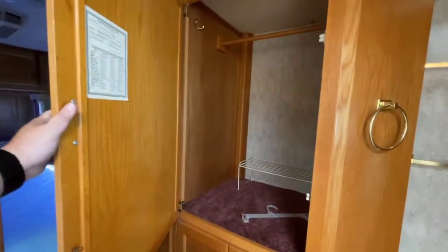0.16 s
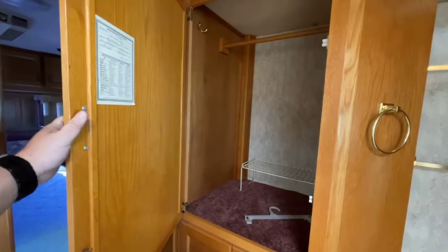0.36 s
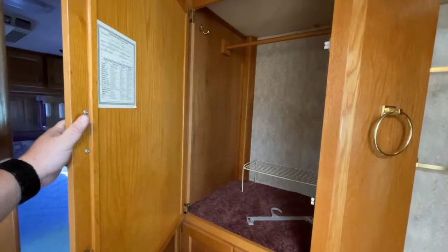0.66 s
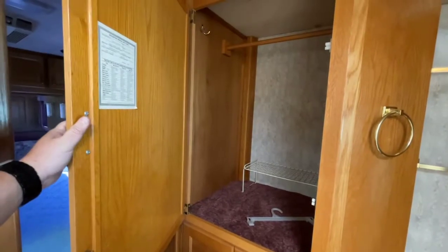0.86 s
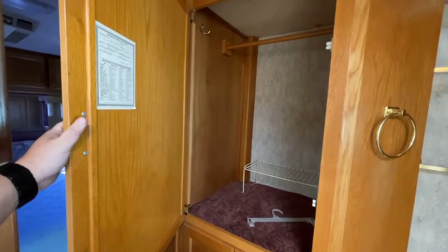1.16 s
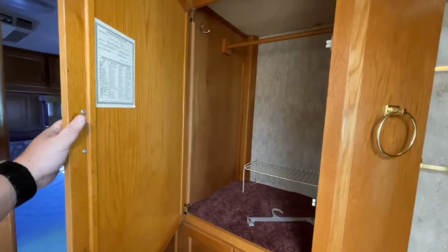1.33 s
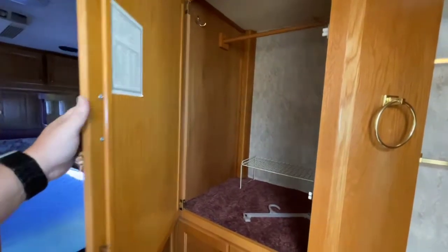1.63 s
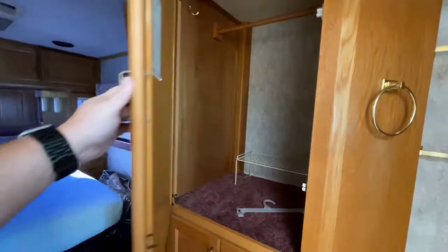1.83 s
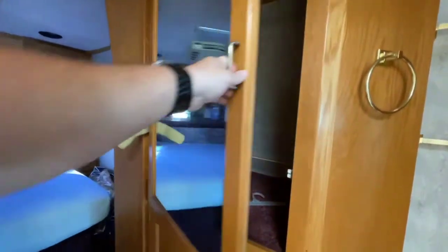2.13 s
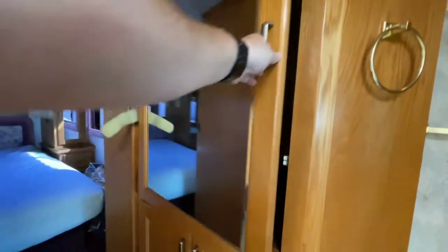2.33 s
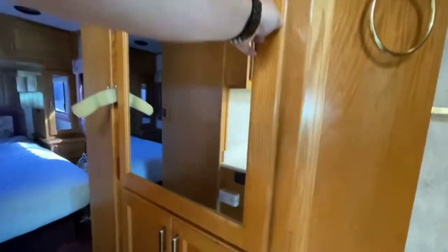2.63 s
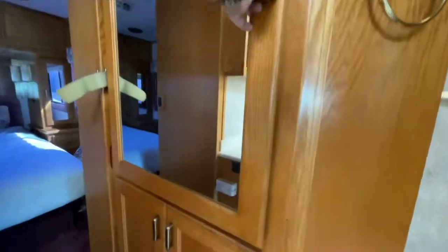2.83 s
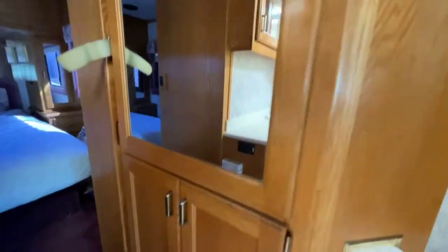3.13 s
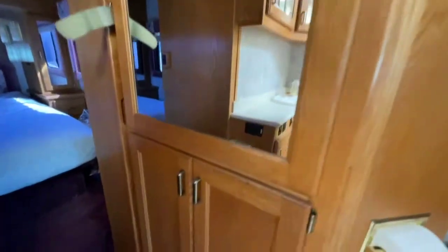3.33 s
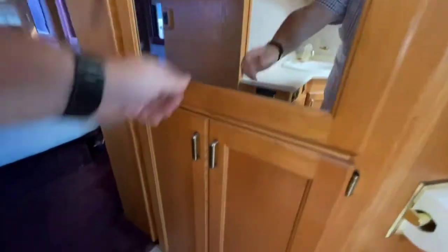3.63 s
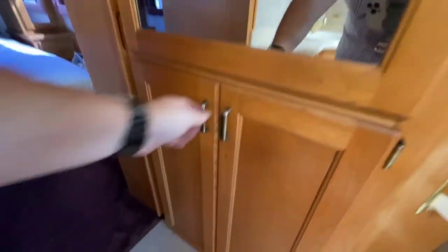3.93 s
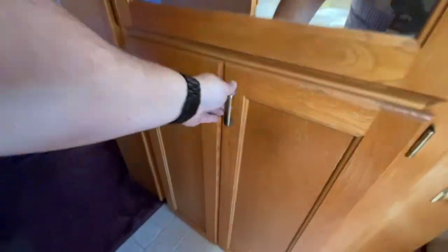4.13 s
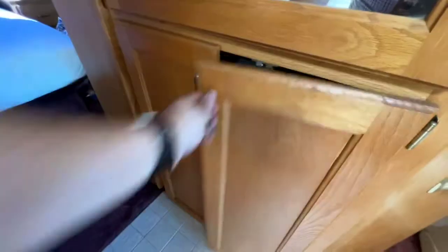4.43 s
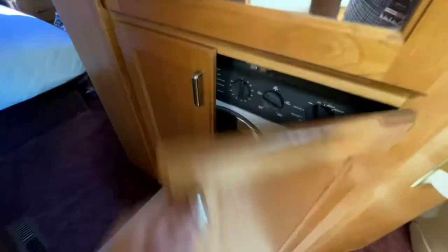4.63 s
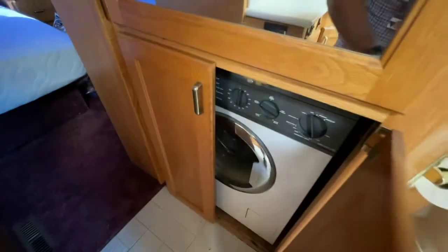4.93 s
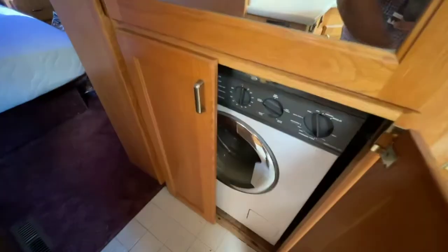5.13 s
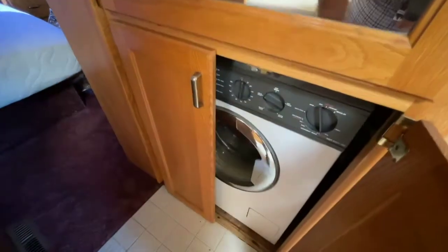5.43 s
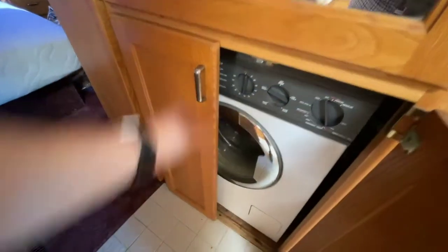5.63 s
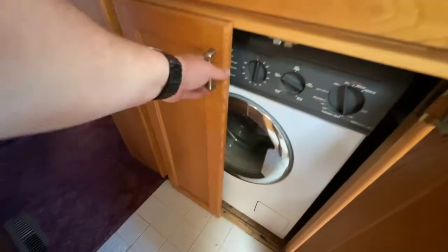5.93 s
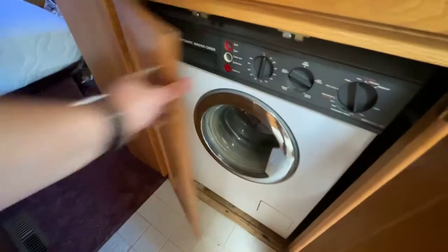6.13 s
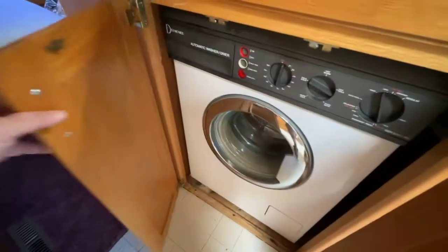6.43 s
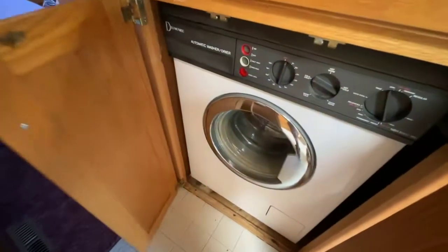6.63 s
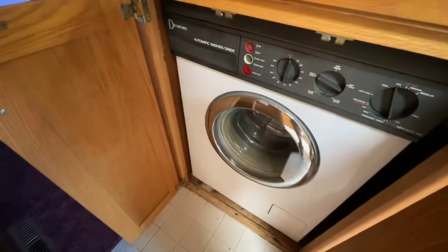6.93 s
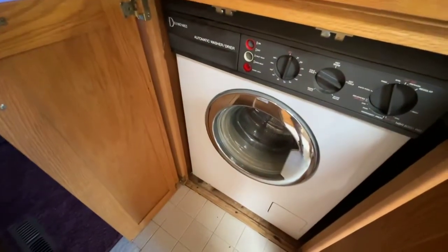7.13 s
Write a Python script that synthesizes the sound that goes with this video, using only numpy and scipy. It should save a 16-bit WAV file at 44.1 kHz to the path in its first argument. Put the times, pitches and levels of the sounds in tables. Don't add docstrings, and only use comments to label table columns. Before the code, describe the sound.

A small wooden vehicle interior, dry and close to a handheld microphone. A soft low rumble with faint passing vehicles runs throughout, swelling slightly with movement. A crisp finger tick at 0.4 s, very faint high squeaks from 0.9 to 2 s, and another tick at 2.1 s. At 2.6 s a hand takes a handle with a tight rattling clack and dull panel thud. At 3.1 s the wardrobe door slams, by far the loudest event: a double or triple crack, deep hollow boom and ringing frame, with small bounces until about 3.5 s. Light touches near 4.1 s, a short grinding drag, then a catch snaps at 4.3 s with a thud and thin spring ring. Soft rubbing around 5 s. A hand knocks at 5.7 s and the second catch snaps at 5.9 s, ringing briefly. Small taps and light rubs fade from 6.1 to 6.9 s, leaving rumble.

```python
import sys
import numpy as np
from scipy import signal
from scipy.io import wavfile

SR = 44100
rng = np.random.default_rng(int(sys.argv[2]) if len(sys.argv) > 2 else 0)


def unload_wav(signal):
    wavfile.write(
        sys.argv[1],
        SR,
        np.round(np.clip(np.atleast_2d(signal).T, -1, 1) * 32767).astype(np.int16),
    )


def undo_db(level):
    steps = np.asarray(level, float) / 20
    return 10 ** steps


N = 321087
STEP = 64


def add(out, start_s, sound):
    i = round(start_s * SR)
    out[i:i + len(sound)] += sound[:N - i]


def at_hz(points, hz):
    table = np.array(points)
    return np.interp(np.log(hz), np.log(table[:, 0]), table[:, 1])


EDGES = 26 * 2 ** np.arange(0, 9.4, 1 / 3)
BANK = [signal.butter(2, EDGES[k:k + 2], "band", fs=SR, output="sos") for k in range(len(EDGES) - 1)]
ALL_BANDS = range(len(BANK))
WOOD_BANDS = range(8, len(BANK))


def band(x, k):
    return signal.sosfilt(BANK[k], x)


def band_centre(k):
    return np.sqrt(EDGES[k] * EDGES[k + 1])


def drift(rate_hz):
    r = np.exp(-2 * np.pi * STEP * rate_hz / SR)
    white = rng.standard_normal(N // STEP + 1002)
    slow = signal.lfilter([1], [1, -2 * r, r * r], white)[1000:]
    return slow[:len(range(0, N + STEP, STEP))] / slow.std()


def spread(slow):
    return np.interp(np.arange(N) / STEP, np.arange(len(slow)), slow)


def peaks(x, table):
    for hz, width_hz, gain_db in table:
        a, w = undo_db(gain_db / 2), 2 * np.pi * hz / SR
        q = np.sin(w) * width_hz / hz / 2
        x = signal.lfilter([1 + q * a, -2 * np.cos(w), 1 - q * a], [1 + q / a, -2 * np.cos(w), 1 - q / a], x)
    return x


def shelve_top(x, depth_db):
    return signal.sosfilt(signal.ellip(6, .5, depth_db, 15750, fs=SR, output="sos"), x)


def modes(t, table, spread_db=0, swell_cycles=0.0444):
    hz, level_db, t60_s = np.transpose(table)[:, :, None]
    level_db = level_db + spread_db * rng.standard_normal(hz.shape)
    decay = undo_db(level_db - 60 * t / np.maximum(t60_s, .01))
    swell = 1 - np.exp(-t * hz / swell_cycles)
    return np.sum(decay * swell * np.sin(2 * np.pi * hz * t), axis=0)


# hz, t60_s
TAIL = [(150, 0.32), (400, 0.62), (1040, 0.31), (2760, 0.25), (7280, 0.13)]


def blows(table, colour, panel, crack_s, tail_db, shrink, swell_cycles):
    out, t, long_t = np.zeros(N), np.arange(SR * 3 // 10) / SR, np.arange(SR * 6 // 10) / SR
    for start_s, crack_db, bright_db, length, thud_db in table:
        rattle_db = 3.1 * np.minimum(rng.exponential(1, len(t) // 32 + 1), 2.8) + 2.0
        clatter = undo_db(rattle_db).repeat(32)[:len(t)]
        white, sound = rng.standard_normal((2, len(t))), 0
        white[:, 0] = 10.0
        length = np.clip(length, .05, 3)
        for k in WOOD_BANDS:
            hz = band_centre(k)
            tail = clatter * undo_db(tail_db - 60 * t / (shrink * length * at_hz(TAIL, hz)))
            crack = np.exp(-t / (crack_s * length * (2000 / hz) ** 0.8))
            shape = (crack + tail) * (1 - t / t[-1])
            gain = undo_db(at_hz(colour, hz) + bright_db * np.log2(hz / 2000))
            sound = sound + gain * band(white[k % 2] * shape + 1e-18, k)
        add(out, start_s, undo_db(crack_db) * sound / np.abs(sound).max())
        add(out, start_s, undo_db(thud_db) * modes(long_t, panel, spread_db=3.0, swell_cycles=swell_cycles))
    return out


def knocks(table, frame):
    out, t = np.zeros(N), np.arange(SR // 4) / SR
    for start_s, level_db, bright_db in table:
        struck = [(hz, db + bright_db * np.log2(hz / 2000), t60_s) for hz, db, t60_s in frame]
        add(out, start_s, undo_db(level_db) * modes(t, struck, spread_db=3.5, swell_cycles=0.34))
    return out


def spring(release_s, table):
    out = np.zeros(N)
    add(out, release_s + .016, modes(np.arange(SR // 2) / SR, table))
    return out


def slips(strokes, colour, rough_db, fade_s):
    out, t = np.zeros(N), np.arange(SR // 6) / SR
    for start_s, length_s, level_db, change_db, bright_db in strokes:
        white, sizes = rng.standard_normal((2, len(t))), rng.exponential(1, len(t))
        grains = white * undo_db(rough_db * sizes)
        plain, tilted = 0, 0
        for k in WOOD_BANDS:
            part = undo_db(at_hz(colour, EDGES[k] * 1.12)) * band(grains[k % 2], k)
            plain = plain + part
            tilted = tilted + undo_db(bright_db * np.log2(EDGES[k] / 4000)) * part
        fade = np.clip(np.minimum(t, length_s - t) / fade_s, 0, 1)
        stroke = undo_db(level_db + change_db * np.minimum(t / length_s, 1)) * fade
        add(out, start_s, stroke * tilted / np.std(plain))
    return out


# time_s, over_rest_db
MOTION = [(0, 4.5), (.4, -0.5), (1.2, 1.3), (2.1, 6), (3.0, 5), (4.0, 9), (4.45, 8), (4.8, 3.5), (5.4, 3),
          (5.9, 10.5), (6.4, 3.5), (7.28, 4)]
# time_s, share_0_to_1
TURN = [(0, 0.01), (.8, 0.49), (2.1, 0), (2.8, 1), (3.6, .55), (5.3, 0.77), (7.28, 0.95)]
# loudest_s, half_length_s,
# over_background_db
PASSES = [(0.01, 0.13, 9.5), (0.768, 0.17, 6.5), (2.491, 0.16, 7), (2.966, 0.033, 10), (4.045, .2, 11),
          (5.299, 0.24, 4), (6.403, 0.083, 8.5), (6.707, .12, 7.5)]
# start_s, over_background_db
SHUDDERS = [
    (2.65, 11.5),
    (3.12, 31),
    (4.27, 9.5),
    (5.72, 13),
    (5.92, 6),
]
# (shares, or levels in dB)
MOTION_SHARE = [0.33, 0.15, 0.067, 1]
TURN_DB = [0.1, 18, 0.089, 0.1]
PASS_SHARE = [0.095, 0.096, 0.86, 0.14]
SHUDDER_DB = [4, -8.5, -21.5, -25.5]
REST_DB = [-5.5, -15.5, -7, -4]


def swells():
    rise_s, fall_s = .07, 0.059
    t = np.arange(0, N + STEP, STEP) / SR
    motion_db, turn = np.interp(t, *np.transpose(MOTION)), np.interp(t, *np.transpose(TURN))
    pass_db = sum(db * np.exp(-.5 * ((t - s) / half_s) ** 2) for s, half_s, db in PASSES)
    shudder = 0
    for start_s, db in SHUDDERS:
        since = np.maximum(t - start_s, 0)
        shudder = shudder + undo_db(db) * (1 - np.exp(-since / rise_s)) ** 2 * np.exp(-since / fall_s / 2)
    ranges_db = []
    for rest, m, u, p, b in zip(REST_DB, MOTION_SHARE, TURN_DB, PASS_SHARE, SHUDDER_DB):
        steady = undo_db(rest + m * motion_db + u * turn + p * pass_db)
        ranges_db.append(20 * np.log10(steady + undo_db(b) * shudder))
    return pass_db, ranges_db


# hz, level_db
AIR_COLOUR = [(15, -52), (25, -23.5), (38, -4), (76, 5), (108, -5.5), (134, -11.5), (285, -17.5),
              (354, -21.5), (560, -24), (1100, -31), (1330, -28.5), (6050, -43), (11000, -50.5),
              (14000, -44.5), (16000, -52.5)]
# hz, width_hz, gain_db
AIR_PEAKS = [(140, 14, 5.5), (273, 9.1, 5.5), (338, 25, 3), (397, 6.7, 4.5), (715, 44, 1.5), (896, 55, 6),
             (1120, 180, 3.5), (2030, 21, 6), (2350, 370, 5)]
# hz, width_hz, level_db
BOOM = [(260, 18, -78.5), (374.7, 41, -78)]


def outdoor_air(patchy_db):
    pass_db, ranges_db = swells()
    white, out = rng.standard_normal((3, N + SR // 4)), 0
    for k in ALL_BANDS:
        hz = band_centre(k)
        shares = [np.interp(np.log(hz), np.log([75, 150, 330, 5000]), row) for row in np.eye(4)]
        gain_db = at_hz(AIR_COLOUR, hz) + sum(a * b for a, b in zip(shares, ranges_db) if a)
        flicker_db = patchy_db * (300 / max(hz, 300)) ** .3 * drift(5)
        out = out + spread(undo_db(gain_db + flicker_db)) * band(white[k % 2], k)[SR // 4:]
    out = undo_db(-25.5) * peaks(out, AIR_PEAKS)
    for hz, width_hz, level_db in BOOM:
        ring = signal.lfilter(*signal.iirpeak(hz, hz / width_hz, fs=SR), white[2])[SR // 4:]
        out = out + spread(undo_db(level_db + 1.87 * pass_db + 0.82 * drift(1.1))) * ring / ring.std()
    return shelve_top(out, 34)


# start_s, length_s, start_hz, end_hz, level_db
SQUEAKS = [(0.928, 0.26, 8500, 8500, -83), (0.996, .15, 6530, 6900, -83), (1.155, .05, 6440, 6400, -78),
           (1.504, 0.14, 5700, 5970, -74.5), (1.736, 0.15, 5870, 6250, -75), (1.855, .07, 5080, 4870, -75),
           (1.932, 0.034, 5900, 5950, -80), (1.581, 0.065, 1120, 1095, -61)]


def far_squeaks():
    out, waver = np.zeros(N), spread(drift(30))
    for start_s, length_s, start_hz, end_hz, level_db in SQUEAKS:
        t = np.arange(0, length_s, 1 / SR)
        wobble = waver[round(start_s * SR):][:len(t)]
        hz = np.interp(t, [0, length_s], [start_hz, end_hz]) * (1 + 0.0086 * wobble)
        level = undo_db(level_db + 3.6 * wobble) * np.sin(np.pi * t / length_s)
        add(out, start_s, level * np.sin(2 * np.pi * np.cumsum(hz) / SR))
    return out


# start_s, pitch_hz, level_db, t60_s
LATE_RINGS = [(4.56, 9540, -69, 0.32), (5.879, 9910, -62, 0.15), (6.1, 2030, -57, 0.16),
              (6.437, 2010, -43, 0.066)]


def late_rings():
    out, t = np.zeros(N), np.arange(SR // 2) / SR
    for start_s, *mode in LATE_RINGS:
        add(out, start_s, modes(t, [mode], swell_cycles=20.3))
    return out


# start_s, length_s, start_level_db, change_db, bright_db_per_octave
RUBS = [(3.026, 0.071, -48.5, 3.5, 1), (4.088, .045, -59, -1, -3), (4.155, 0.033, -59, 1, -2.5),
        (4.56, 0.11, -72.5, -8.5, -6), (4.89, .11, -68.5, 0.5, 5.5), (5.872, 0.032, -72, 11, -3),
        (5.900, 0.0097, -44, 3.5, 4.5), (5.115, 0.13, -56.5, -8, -2), (5.795, .039, -51, -3, -0.5),
        (6.55, .11, -62, -2.5, 7.5), (6.655, 0.082, -53.5, -9.5, 4), (6.74, 0.085, -73, -3, 11)]
# hz, level_db
RUB_COLOUR = [(180, -32.5), (300, 3), (478, -7), (624, 0), (1120, -3.5), (3830, -7), (4440, -13.5),
              (7950, -18), (10400, -22.5), (14200, -22.5), (16000, -23.5)]


def hand_rubs():
    return shelve_top(slips(RUBS, RUB_COLOUR, rough_db=1.4, fade_s=0.0029), 34)


CRACK_S = dict(grip=.005, slam=.004, right=.0016, left=.003, tick=.002)
# start_s, crack_db, bright_db_per_octave, tail_length_factor, thud_db
TICKS = [(.4309, -39, 3.5, 0.82, -59.5), (1.475, -56, 0, 1.2, -59.5), (4.2265, -67, -10, 1.1, -54),
         (2.1268, -40.5, -0.5, 0.96, -80), (4.088, -59.5, -17, 1.5, -69), (4.118, -61, 1.5, 2.3, -53),
         (4.155, -52.5, 2, 1.52, -49), (4.9338, -45.5, -5.5, 0.96, -61.5), (6.1614, -49, -2, 0.78, -68.5),
         (6.2434, -48.5, -1, 1.1, -73), (6.2773, -51.5, -3, 1.2, -69), (6.379, -44, 7.5, 0.72, -71),
         (6.44, -49.5, -5.5, 2.4, -66), (6.8717, -46, -6, 1.8, -45.5)]
# hz, level_db
TICK_COLOUR = [(350, -35.5), (600, -5.5), (1010, -25), (1880, -3), (2310, -10), (2990, -3.5), (3700, -10),
               (4910, -14), (11200, -18), (16000, -28.5)]
# hz, level_db, t60_s
HAND = [(147.4, -3.5, 0.198), (379, -11, 0.15), (554, -5.5, 0.083), (735, 1.5, 0.042), (1030, -2, 0.07),
        (1410, 3, 0.028), (1660, -7, 0.053)]


def finger_ticks():
    taps = blows(TICKS, TICK_COLOUR, HAND, CRACK_S["tick"], tail_db=-15.5, shrink=1.0, swell_cycles=0.84)
    return shelve_top(taps, 7.0)


# start_s, crack_db, bright_db_per_octave, tail_length_factor, thud_db
GRIP = [(2.622, -26, -2, 0.76, -57), (2.636, -32, 10, 1.2, -55), (2.642, -22, 4.5, 0.72, -43),
        (2.647, -22, -1.6, 0.88, -44), (2.66, -36, 5.5, 2.56, -37.5), (2.689, -49, -22, 1.14, -27.5),
        (2.71, -55, -6, 1.2, -30), (2.765, -51, 11, 2.7, -51)]
# hz, level_db
GRIP_COLOUR = [(88, -33), (150, -3), (475, -11), (601, -3.5), (1120, -8), (1600, -0.5), (1790, -7),
               (1940, 2), (2140, -5.5), (3770, -7.5), (4760, -18), (5680, -18), (10800, -39.5),
               (16000, -45.5)]
# hz, level_db, t60_s
GRIP_PANEL = [(86, -0.7, 0.29), (45, -3.5, 0.25), (139, -7, 0.082), (316, -18.5, 0.22), (600, -16, 0.12)]
# start_s, level_db, bright_db_per_octave
GRIP_KNOCKS = [(2.6225, -40, 0.5), (2.636, -50, 2), (2.6445, -36.5, -2), (2.648, -31, 0), (2.653, -41, 4)]
# hz, level_db, t60_s
GRIP_FRAME = [(599, -3, 0.11), (1190, -9, 0.046), (1604, 5, 0.047), (1710, 0.5, 0.051), (2030, -3, 0.056),
              (2821, -5, .04), (3630, -6, .04), (5000, -11, .02), (5670, -10, .05), (6150, -14, 0.037)]


def handle_grip():
    hits = blows(GRIP, GRIP_COLOUR, GRIP_PANEL, CRACK_S["grip"], tail_db=-0.5, shrink=0.78, swell_cycles=0.18)
    return shelve_top(hits, 7.0) + knocks(GRIP_KNOCKS, GRIP_FRAME)


# start_s, length_s, start_level_db, change_db, bright_db_per_octave
DRAGS = [
    (4.259, 0.039, -41, 4, -1.5),
    (5.897, 0.03188, -47, 4.33, -2.5),
]
# hz, level_db
DRAG_COLOUR = [(88, -29), (150, 3.5), (391, -13), (637, -1), (1450, -8.5), (1830, -18.5), (2500, -16),
               (4410, -20), (4860, -20.5), (9440, -24.5), (10800, -43), (16000, -39)]


def catch_drags():
    return shelve_top(slips(DRAGS, DRAG_COLOUR, rough_db=0.6, fade_s=0.002), 34)


# start_s, crack_db, bright_db_per_octave, tail_length_factor, thud_db
LEFT_CATCH = [
    (5.704, -40, -0.5, 2.24, -37.5),
    (5.712, -42, -3, 2.6, -39.5),
    (5.729, -37, -10.5, 1.55, -43),
    (5.928, -10.5, 7.5, 0.89, -29),
    (5.934, -14, -0.8, 1, -54),
    (5.944, -25, 6, 2.23, -31.5),
    (5.961, -37.5, -6, 1.1, -33.5),
]
# hz, level_db
LEFT_COLOUR = [(88, -31), (150, -6.5), (426, -10), (1010, 2), (1500, -13), (1790, 0), (2460, -13),
               (3870, -5.5), (4800, -9.5), (7260, -10), (13900, -30), (16600, -32.5)]
# hz, level_db, t60_s
LEFT_DOOR = [(58.6, -3.5, 0.27), (106, 4, 0.12), (164, -3, 0.74), (242.6, -5.5, 0.23), (349, -1, 0.098),
             (720, -22.5, .13), (1075, -13.5, 0.096)]
# hz, level_db, t60_s
LEFT_SPRING = [(2840, -44, .4), (2851.5, -51, .4), (4118, -46, .2), (5066, -66, .3)]
# start_s, level_db, bright_db_per_octave
LEFT_KNOCKS = [(5.705, -52.5, 0), (5.709, -48.5, -0.4), (5.721, -54, -1.2), (5.9285, -29.5, 2.6),
               (5.934, -36.5, -1), (5.944, -32.5, -1.2), (5.961, -43.5, -1.5)]
# hz, level_db, t60_s
LEFT_FRAME = [(419, -3, 0.05), (748, -6.5, 0.075), (978, -7, 0.068), (1820, -7.5, .06), (2067, -1.5, .06),
              (2266, -4.5, .06), (2480, -8, .04), (3350, -9, .06), (3960, -3.5, .05), (4124, 1, 0.057),
              (4608, -7.5, .05)]


def left_door():
    hits = blows(LEFT_CATCH, LEFT_COLOUR, LEFT_DOOR, CRACK_S["left"], tail_db=-1, shrink=0.5, swell_cycles=1.0)
    return shelve_top(hits, 7.0) + spring(LEFT_CATCH[3][0], LEFT_SPRING) + knocks(LEFT_KNOCKS, LEFT_FRAME)


# start_s, crack_db, bright_db_per_octave, tail_length_factor, thud_db
RIGHT_CATCH = [
    (4.228, -44, -11.5, 2.1, -42),
    (4.291, -9.5, 4, 0.78, -29.5),
    (4.296, -14, 1.9, 1.43, -37.5),
    (4.308, -25, -4, 0.88, -23),
    (4.334, -33.5, -3, 0.96, -35.5),
    (4.115, -68, -12.5, 1.3, -40.5),
]
# hz, level_db
RIGHT_COLOUR = [(88, -29), (150, 0.5), (632, -6), (1440, -5.5), (1940, -9.5), (2880, -10), (3170, -8),
                (6080, -14), (6710, -10.5), (10600, -18), (13400, -17), (16600, -49)]
# hz, level_db, t60_s
RIGHT_DOOR = [(42.9, 5.5, 0.348), (67.2, 0, 0.26), (139.7, -2.5, 0.44), (326.5, -5.5, 0.2),
              (453, -12, 0.17)]
# hz, level_db, t60_s
RIGHT_SPRING = [(2889, -45, .46), (2924, -48, .44), (5050, -58, .37), (5324, -54, .45), (5345, -62, .4)]
# start_s, level_db, bright_db_per_octave
RIGHT_KNOCKS = [(4.227, -70, -3.5), (4.261, -55, -1), (4.266, -56, -3), (4.272, -52, -7),
                (4.2915, -32.5, 2.5), (4.2965, -32.5, 1), (4.305, -36, -1.5), (4.312, -40, -1),
                (4.322, -42.5, -5)]
# hz, level_db, t60_s
RIGHT_FRAME = [(473, -11, 0.056), (760, -2, 0.033), (1150, -6, .04), (1444, -3, .04), (2275, -3.5, .06),
               (2605, -2.5, 0.036), (2840, -3.5, 0.084), (3693, -2.5, .06), (4300, -2.5, 0.064),
               (4770, -8.5, .06), (5490, -7, .07), (6530, -5, 0.062)]


def right_door():
    hits = blows(RIGHT_CATCH, RIGHT_COLOUR, RIGHT_DOOR, CRACK_S["right"],
                 tail_db=-11.5, shrink=0.53, swell_cycles=0.36)
    return shelve_top(hits, 7.0) + spring(RIGHT_CATCH[2][0], RIGHT_SPRING) + knocks(RIGHT_KNOCKS, RIGHT_FRAME)


# start_s, crack_db, bright_db_per_octave, tail_length_factor, thud_db
SLAM = [(3.091, -21, 0.5, 1.3, -33), (3.095, -20, 4, 0.56, -11), (3.1156, -4.5, 3, 0.58, -26.5),
        (3.1195, -1, 1.1, 0.62, -13), (3.143, -10, 2, 0.57, -30), (3.147, -15.5, 2.5, 1.17, -16.5),
        (3.2245, -36, -1.5, 0.51, -27.5), (3.243, -25.5, -3.5, 0.49, -46), (3.276, -34, -2, 0.41, -30.5),
        (3.262, -39.5, -2, 1.4, -46), (3.302, -34.5, -3.5, 0.42, -41), (3.318, -31.5, -3.5, 0.63, -45),
        (3.357, -46.5, 5.5, 1.05, -43.5), (3.542, -50, 3.5, 0.46, -73)]
# hz, level_db
SLAM_COLOUR = [(88, -31), (150, -1), (422, -3.5), (555, -10), (675, -4), (1000, -21.5), (1690, -12),
               (3550, -22.5), (4240, -24), (13700, -50.5), (16000, -57.5)]
# hz, level_db, t60_s
WARDROBE = [(48.3, -5.5, 0.94), (73.8, 2.5, 0.36), (107, -5, 0.23), (127.4, 0, 0.27), (147.4, -4.5, 0.31),
            (187.8, -4.5, 0.39), (237.7, -13, 0.39), (316.7, -9, 0.19), (398.6, -8, .26), (448, -17, 0.21),
            (534, -10, 0.098), (662, -11, 0.12), (697, -11.5, 0.14), (1010, -24, 0.035), (1158, -15.5, .2)]
# start_s, level_db, bright_db_per_octave
SLAM_KNOCKS = [(3.0913, -28, -2.5), (3.1154, -10, 1.5), (3.1200, -23.5, 1.5), (3.1430, -14.5, 0.5),
               (3.224, -40.5, -5), (3.2415, -48, -9), (3.3023, -54.5, -7), (3.3093, -50, -3)]
# hz, level_db, t60_s
SLAM_FRAME = [(399.5, -2.5, .2), (477, -10, .1), (690, -3, .14), (1152, -7, 0.15), (1377, -10, .1),
              (7000, -9.5, .01), (1675, -7, .1), (2063, -8.5, .08), (2277, -7.5, 0.097), (2570, -7.5, .08),
              (3130, -14.5, 0.054), (3770, -10.5, 0.044), (4400, -5, 0.026), (4820, -11.5, 0.018)]


def wardrobe_slam():
    hits = blows(SLAM, SLAM_COLOUR, WARDROBE, CRACK_S["slam"], tail_db=-5.5, shrink=0.99, swell_cycles=0.54)
    return shelve_top(hits, 7.0) + knocks(SLAM_KNOCKS, SLAM_FRAME)


def scene():
    background = outdoor_air(patchy_db=3.5) + far_squeaks() + late_rings()
    hand = hand_rubs() + finger_ticks() + handle_grip()
    low_doors = catch_drags() + left_door() + right_door()
    return (background + hand + low_doors + wardrobe_slam())[None]


# hz, width_hz, gain_db
MIC = [(9320, 520, 4.5), (10730, 2000, -3), (13950, 2500, 4)]


def microphone(x):
    return peaks(x, MIC)


def band_limit(x):
    return signal.sosfilt(signal.butter(12, 16980, fs=SR, output="sos"), x)


def record(dry):
    x = microphone(dry)
    x = x / (1 + np.abs(x / .97) ** 4) ** .25
    x = signal.sosfilt(signal.ellip(8, .5, 60, 16750, fs=SR, output="sos"), x)
    return band_limit(x)


dry = scene()
out = record(dry)
unload_wav(out)
```